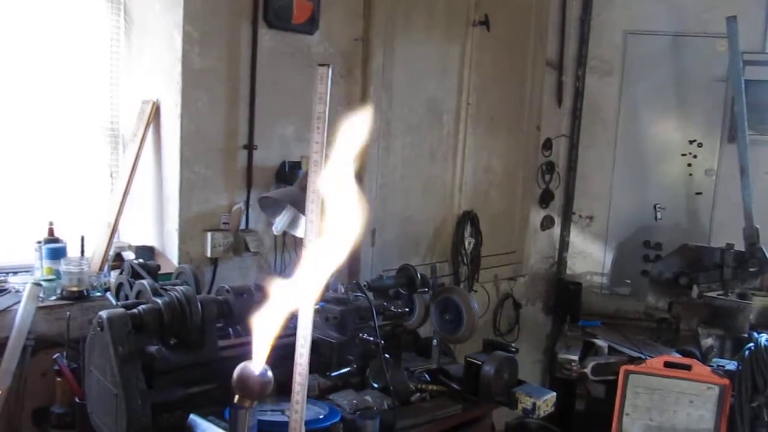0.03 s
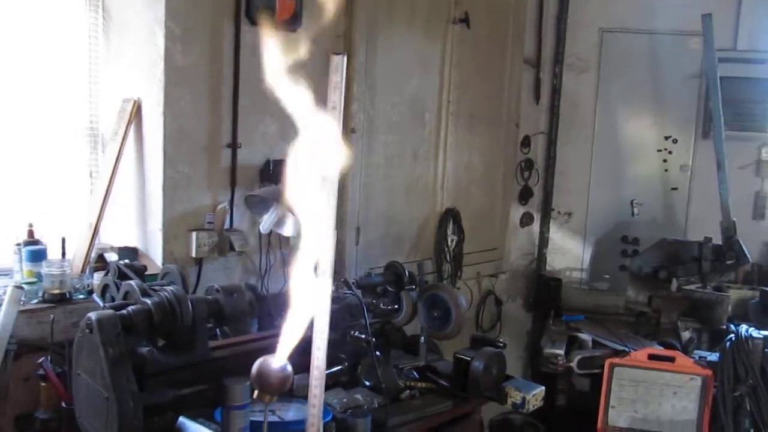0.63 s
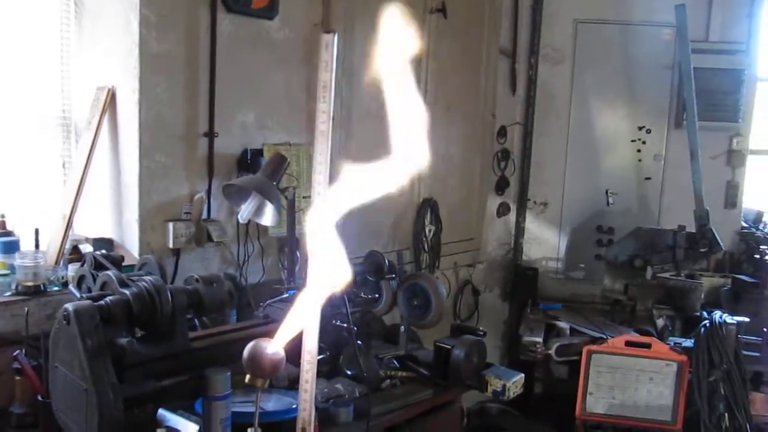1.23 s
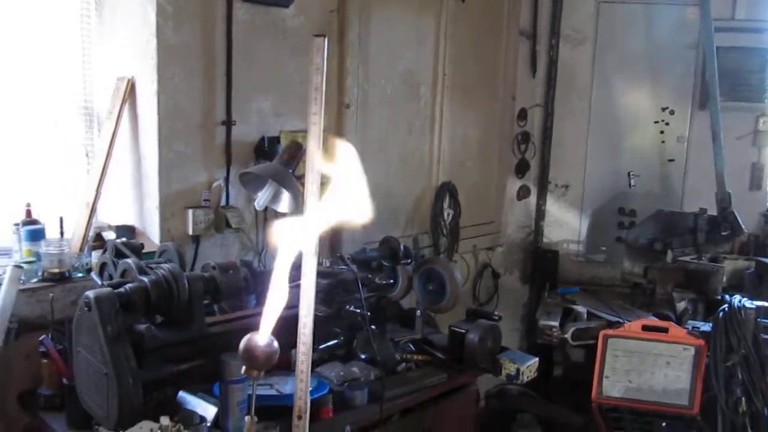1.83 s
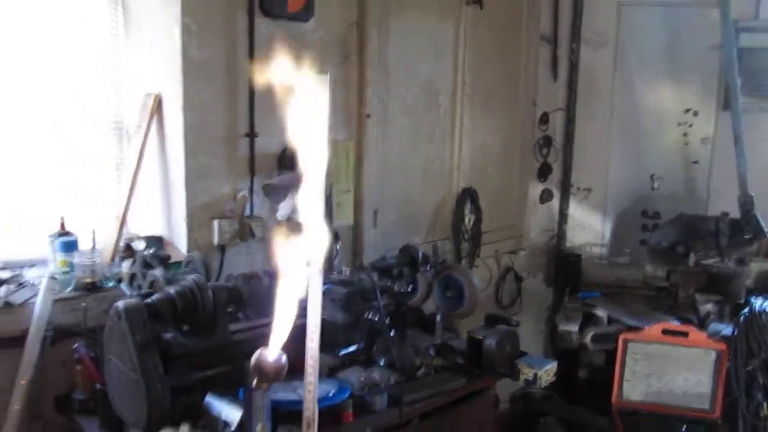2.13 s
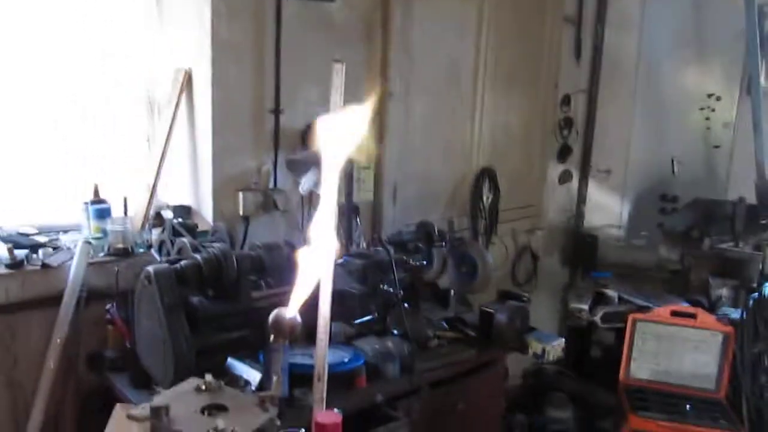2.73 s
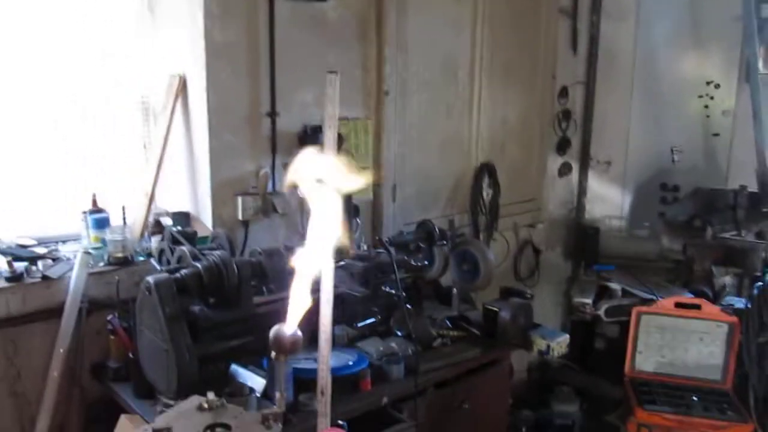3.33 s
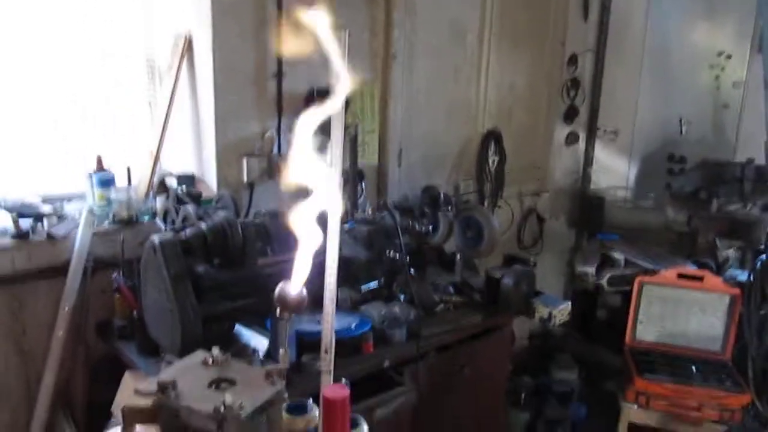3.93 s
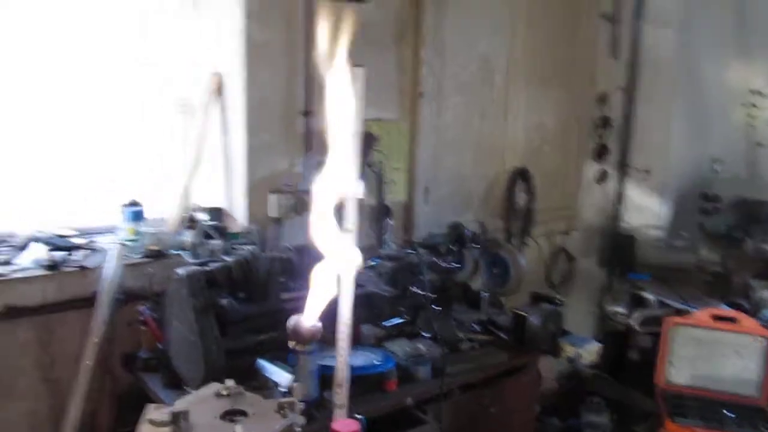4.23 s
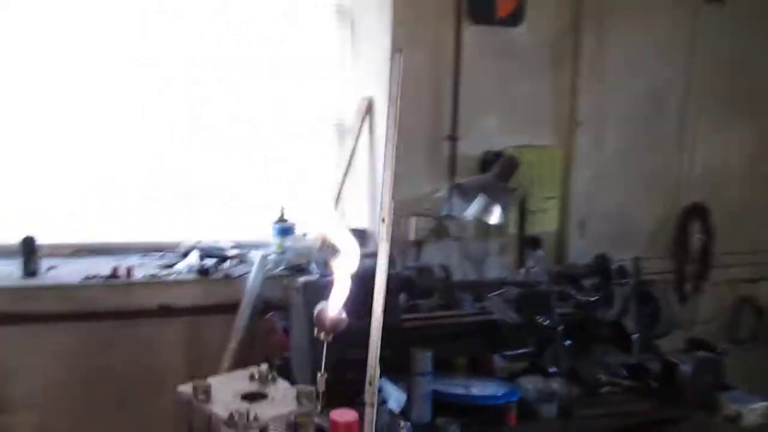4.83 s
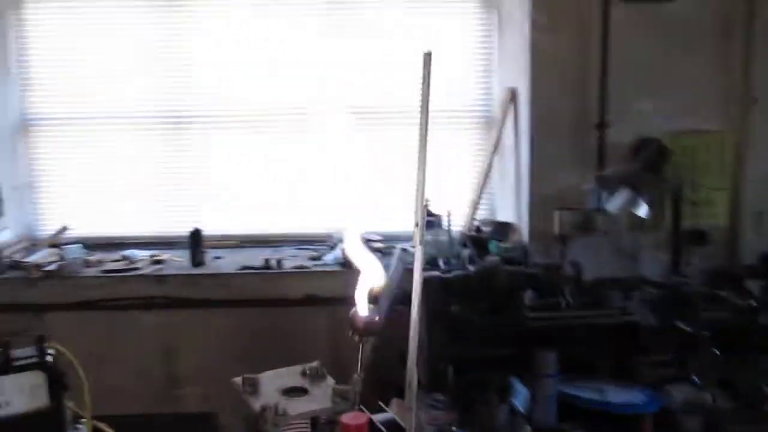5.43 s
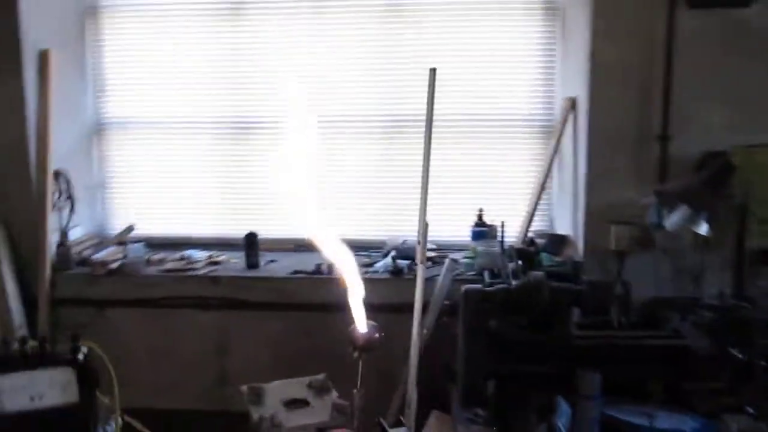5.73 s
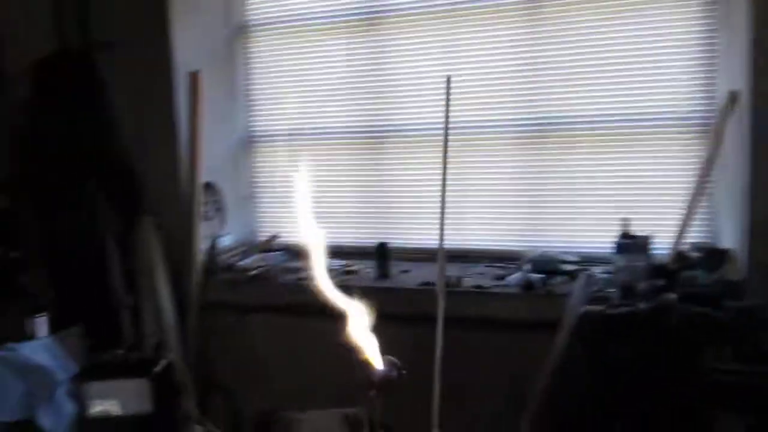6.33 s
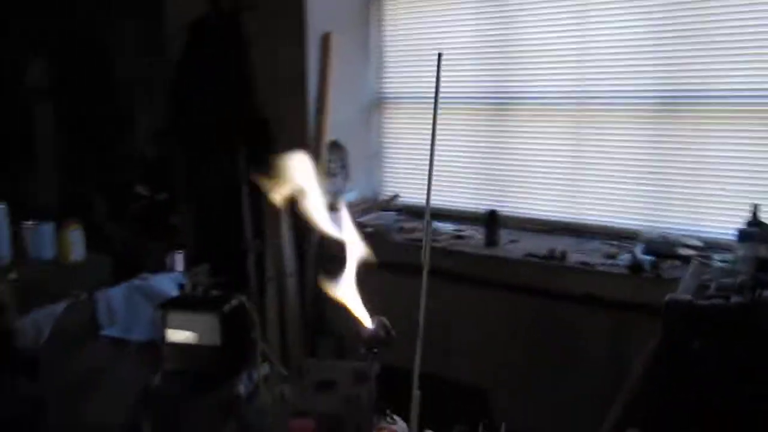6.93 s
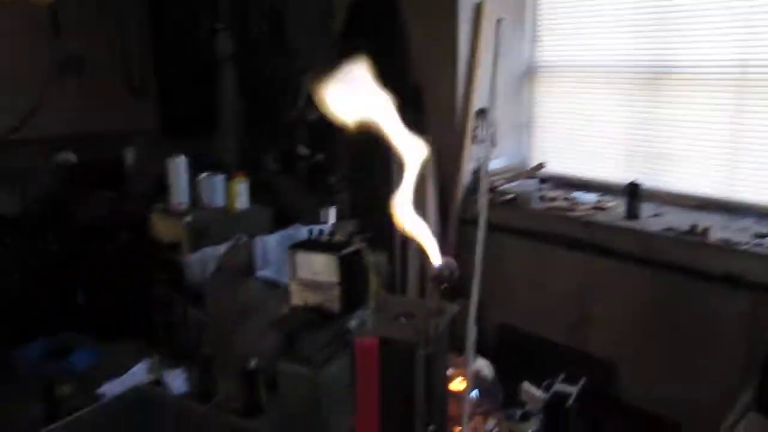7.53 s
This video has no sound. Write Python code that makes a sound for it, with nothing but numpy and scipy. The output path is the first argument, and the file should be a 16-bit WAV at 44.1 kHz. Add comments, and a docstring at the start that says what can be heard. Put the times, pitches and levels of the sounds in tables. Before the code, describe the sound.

A high-voltage flame buzzes and sizzles harshly over hum and cooling fans in a workshop, with a few sharp handling clicks.

```python
"""A harsh buzz and sizzle, flaring and sinking, fills a small workshop: a flame-like high-voltage
discharge on a ball electrode, which strikes and goes out on every half-cycle of the mains, and once
whooshes softly as it flares. Beneath it lie the harmonic hum of its supply and the blade tones and
rushing air of cooling fans. A hand-held camera is carried around it, so the balance shifts;
handling clicks and rubs the case, and the loud clicks duck its gain control."""
import sys
import numpy as np
from scipy import signal
from scipy.fft import rfft, irfft
from scipy.io import wavfile
from scipy.ndimage import uniform_filter1d, map_coordinates

SR = 44100
rng = np.random.default_rng(int(sys.argv[2]) if len(sys.argv) > 2 else 0)


def materialize(psi):
    """Save the field psi as 16-bit PCM at rate SR to the path in sys.argv[1].

    A 1-D psi becomes a single channel; in a 2-D psi each row is a channel.
    """
    bounded = np.clip(np.atleast_2d(psi).T, -1, 1)
    quanta = np.round(bounded * 32767).astype(np.int16)
    wavfile.write(sys.argv[1], SR, quanta)


N = 335160
TIME = np.arange(N) / SR
STRIKE_HZ, FIRST_STRIKE_S, BURN_S = 99.97, 0.00735, 0.00445   # two strikes per mains cycle
BAND_EDGE_HZ = SR / 2 - 100


def from_db(db):
    """Amplitude ratio of a level in decibels."""
    return 10 ** (np.asarray(db) / 20)


def rms_one(x):
    """Normalisation to unit mean square."""
    return x / np.sqrt(np.mean(x ** 2) + 1e-20)


def in_time(rows):
    """Linear interpolation of each column against the first, t/s, at every sample."""
    times, *columns = np.transpose(rows)
    return [np.interp(TIME, times, column) for column in columns]


def drift(per_s):
    """Smooth random modulation of unit rms: a cubic spline through Gaussian knots."""
    knots = rng.standard_normal(2000)
    return rms_one(map_coordinates(knots, [TIME * per_s], order=3, mode="wrap"))


def coloured(x, colour):
    """Spectral shaping by a curve of (f/Hz, gain/dB), returned at unit rms."""
    hz, db = np.transpose(colour)
    bin_hz = np.maximum(np.arange(N + 1) * SR / (2 * N), 1)
    gain = from_db(np.interp(np.log(bin_hz), np.log(hz), db))
    return rms_one(irfft(rfft(x, 2 * N) * gain)[:N])


def band(x, hz, kind, order=2):
    """Butterworth filter: a maximally flat passband."""
    return signal.sosfilt(signal.butter(order, hz, kind, fs=SR, output="sos"), x + 1e-18)


def ring(x, hz, t60):
    """Damped oscillator: a unit impulse excites a unit sine that decays by 60 dB in t60 seconds."""
    radius, angle = from_db(-60 / (t60 * SR)), 2 * np.pi * hz / SR
    return signal.lfilter([0, np.sin(angle)], [1, -2 * radius * np.cos(angle), radius ** 2], x + 1e-18)


def port(x, t60):
    """Resonance of the microphone port: a low-pass that rings after every sharp edge."""
    damped = band(ring(x, hz=9300, t60=t60), 10500, "low", order=4)
    return band(damped, BAND_EDGE_HZ, "low")


def impulses(times, sizes):
    """Band-limited interpolation: windowed sinc pulses fall between the samples."""
    at = np.floor(times * SR).astype(int)[:, None] + np.arange(-7, 9)
    offset = at - times[:, None] * SR
    taps = sizes[:, None] * np.sinc(offset) * np.cos(np.pi * offset / 16) ** 2
    inside = (at >= 0) & (at < N)
    return np.bincount(at[inside], taps[inside], N)


def reverberation(x, t60, early_db, early_s, changes):
    """Diffuse reflections, whose pattern changes as the flame writhes and the microphone moves."""
    age = np.arange(SR // 3) / SR
    decay = from_db(-60 * age / t60) + from_db(early_db) * np.exp(-age / early_s)
    hop = N // changes + 1
    padded = np.pad(x, (hop, 2 * hop))
    crossfade = np.sin(np.linspace(0, np.pi, 2 * hop))
    out = np.zeros(len(padded) + len(age))
    for at in range(0, (changes + 1) * hop, hop):
        response = rms_one(decay * rng.standard_normal(len(age)))
        echoes = signal.fftconvolve(crossfade * padded[at:at + 2 * hop], response)
        out[at:at + len(echoes)] += echoes
    return rms_one(out[hop:hop + N])


def fans(facing, pass_s=5.52, pass_width_s=0.91, recede_db_per_s=2.5, waver_rad=0.068):
    """Blade tones over turbulent air; the housing's cavity resonance swells as the microphone passes."""
    # blade tones: f/Hz, level by the bench/dB, level by the window/dB
    blade_tones = [(183.1, -53, -56.5), (366.3, -50.5, -54.5), (521, -70, -61), (547, -64, -54),
                   (725, -65, -59)]
    # spectrum of the rushing air: f/Hz, relative level/dB
    air_colour = [(20, 5.5), (42, 8), (80, 4.5), (200, 4), (450, 1), (600, 4.5), (800, 0.5), (1500, -3.5),
                  (2800, 0), (5000, -7.5), (9500, -4), (12000, -21.5), (16000, -41)]
    receding_db = recede_db_per_s * np.maximum(TIME - pass_s, 0)
    tones = 0
    for hz, bench_db, window_db in blade_tones:
        level_db = (1 - facing) * bench_db + facing * window_db - receding_db + 1.9 * drift(7.2)
        tones += from_db(level_db) * np.sin(2 * np.pi * hz * TIME + waver_rad * drift(4.3))
    passing = np.exp(-((TIME - pass_s) / pass_width_s) ** 2)
    air = from_db(-49.5 + 3 * facing + 2.5 * passing) * coloured(rng.standard_normal(N), air_colour)
    cavity = ring(rng.standard_normal(N), hz=542, t60=0.17)
    drone = from_db(-68.5 + 15 * passing) * rms_one(band(cavity, 390, "high"))
    return np.sqrt(2) * tones + air + drone


def supply_hum(place, hum_db=-54, waver_rad=0.58, shiver_rad=0.0053):
    """Standing waves: the balance of the supply's harmonics depends on the place in the room."""
    # harmonics of the strike rate, from the first upwards:
    # relative level/dB by the bench, a step back, by the window, past it
    harmonics = [(4, -0.5, 2.5, 0.5), (0, -0.5, 3, -1), (-2, -8.5, -23, -11.5), (-8.5, -2.5, -17, -3.5),
                 (-8.5, -7.5, -5, -12), (-6.5, -2.5, -3, -3.5), (-24, -19, -13, -16), (0, 0.5, -28, -6.5),
                 (-6, -10, -8, -5.5), (-6, -12, -3.5, -5.5), (-26, -3, -14, -16), (-7, -6.5, -1.5, -5),
                 (-1, -5, -11, -7), (-11, -12, -10, -14), (-5.5, -5.5, -15, -6), (-1, -6, -7, -3.5),
                 (-7.5, -4.5, -4, -11), (-5, -13, -20, -13), (-5, -4, -20, -3), (-26, -24, -22, -14),
                 (-26, -23, -12, -8), (-5, -15, -22, -8)]
    places = [0, 0.25, 1, 1.15]
    phase = 2 * np.pi * STRIKE_HZ * TIME + shiver_rad * drift(70)
    out = 0
    for k, place_db in enumerate(harmonics, 1):
        nodes_db = 0.93 * np.log(1 + k) / 2 * drift(2.27)   # shorter waves have sharper nodes
        rough_db = (1.05 + 0.057 * k) * drift(14)   # the restless flame roughens the higher ones
        level_db = np.interp(place, places, place_db) + nodes_db + rough_db
        lag = np.sqrt(7) * k ** 2   # the room spreads the harmonics over the whole cycle
        out += from_db(level_db) * np.sin(k * phase + lag + waver_rad * drift(2.916))
    return np.sqrt(2) * from_db(hum_db) * out


def whoosh_and_rubs(grain_db=3):
    """Band-limited noise bursts: a soft low whoosh as the flame flares, then skin rubbing on plastic."""
    # the flame's whoosh (first row) and rubs on the case (the other rows):
    # t/s, duration/s, greatest level/dB, centre f/Hz, bandwidth/octaves
    bursts = [(1.53, 0.12, -51, 190, 2.4), (2.798, 0.025, -43.5, 2500, 1.1),
              (2.977, 0.033, -43, 10700, 0.31), (2.99, 0.036, -34.5, 2470, 0.59),
              (2.999, 0.014, -37, 8950, 1.1), (3.028, 0.043, -46, 10300, 0.42),
              (3.05, 0.016, -60.5, 2390, 0.9), (5.065, 0.093, -39.5, 950, 1.8),
              (5.066, 0.094, -39, 3300, 1.5), (5.158, 0.089, -43, 1500, 1.8),
              (5.759, 0.081, -44.5, 2800, 1.2), (5.88, 0.015, -36.5, 1080, 0.76),
              (6.049, 0.13, -42, 4000, 1.05), (6.93, 0.077, -41.5, 1770, 0.4)]
    size = SR // 2
    out, age = np.zeros(N + size), np.arange(size) / SR
    for start, length, db, hz, octaves in bursts:
        grains = rng.standard_normal(size) * from_db(grain_db * rng.standard_normal(size))
        edge_ratio = 2 ** (octaves / 2)
        noise = rms_one(band(grains, [hz / edge_ratio, hz * edge_ratio], "band", order=3))
        progress = 4.65 * age / length   # loudest where this reaches 1
        at = int(start * SR)
        out[at:at + size] += from_db(db) * noise * progress * np.exp(1 - progress)
    return out[:N]


def case_clicks(tick_t60=0.0012, rattle_db=-15, rattle_s=0.0016, body_db=-19, body_s=0.0041):
    """Impact excitation: the case gives way with a knock, a tick and a rattle, then rings in its modes."""
    # clicks: t/s, knock level/dB, knock f/Hz, knock t60/s, tick level/dB, tick f/Hz
    clicks = [(2.4565, -18, 1390, 0.0083, -5.5, 9800), (2.4568, -5, 3530, 0.0014, -8, 7340),
              (2.4793, -19, 2900, 0.0038, -33, 9500), (2.4820, 2, 2760, 0.003, 2.5, 8500),
              (2.4822, -9.5, 1330, 0.014, -4, 10000), (2.9193, -22, 3800, 0.02, -4.5, 10300),
              (2.93, -37, 2300, .008, -31, 9500), (2.9555, -31, 2400, .006, -32, 10300),
              (2.9658, -31, 4050, .008, -17, 10000), (3.0111, -8, 2520, 0.0077, -21, 9600),
              (3.0614, -24, 3990, 0.033, -19.5, 9450), (3.063, -21.5, 2970, 0.0099, -26, 6940),
              (3.0619, -30, 12600, .025, -37, 10000), (3.4380, -31.5, 5070, 0.0076, -19, 10000),
              (3.5115, -21.5, 3850, 0.007, -17, 7900), (3.5149, -19, 2400, .004, -0.5, 10800),
              (3.5166, 4.5, 2480, 0.0053, -4.5, 9300), (3.5196, 12, 1820, 0.0012, 15.5, 9770),
              (3.5182, 1, 5370, 0.0021, -3, 7860), (3.7240, -21, 2370, 0.0019, -25, 8000),
              (5.0677, -21, 1170, 0.012, -34, 9000), (5.0678, -29, 3280, 0.0021, -40, 6000),
              (5.7458, -14, 2300, 0.006, -36, 9100), (5.7453, -22, 3650, 0.012, -38, 9000),
              (5.8156, -14.5, 2300, 0.0015, -25.5, 10700), (7.5533, -16, 2940, 0.0026, -22, 10400),
              (7.557, -19.5, 3600, 0.014, -35, 9000), (7.5564, -11, 1960, 0.0026, -21, 7950)]
    # modes of the case: f/Hz, level relative to the tick/dB, t60/s
    case_modes = [(1610, -40, 0.056), (4160, -42.5, 0.093), (4590, -18.5, 0.012), (9600, -38, 0.047)]
    # dull bumps against the case: t/s, level/dB, f/Hz, t60/s
    thumps = [(2.481, -23, 78, 0.023), (2.483, -30, 271, 0.12), (3.516, -26.5, 298, 0.13),
              (5.0667, -37, 430, 0.027)]
    size = SR // 4
    out, age = np.zeros(N + size), np.arange(size) / SR
    blow = signal.unit_impulse(size)
    ringing = sum(from_db(db) * ring(blow, hz, t60) for hz, db, t60 in case_modes)
    for start, knock_db, knock_hz, knock_t60, tick_db, tick_hz in clicks:
        tick = ring(ring(blow, tick_hz, tick_t60), tick_hz, tick_t60)   # builds up over a few cycles
        tick = band(tick, BAND_EDGE_HZ, "low")
        chatter = rms_one(port(rng.standard_normal(size), t60=0.00082))
        rattle = from_db(rattle_db) * chatter * np.exp(-age / rattle_s)
        body = rms_one(band(rng.standard_normal(size), [1200, 4800], "band"))
        knock = ring(blow, knock_hz, knock_t60) + from_db(body_db) * body * np.exp(-age / body_s)
        bright = tick / np.abs(tick).max() + rattle + ringing
        at = int(start * SR)
        out[at:at + size] += from_db(knock_db) * knock + from_db(tick_db) * bright
    # small parts radiate little bass; only a bump of the whole case does
    bumps = sum(ring(impulses(np.array([t]), from_db([db])), hz, t60) for t, db, hz, t60 in thumps)
    return band(out[:N], 1110, "high") + bumps


def strikes_and_pops(jitter_s=8e-6, flicker_db=1.0, lopsided_db=0.5, lopsided_s=40e-6):
    """Periodic breakdown and extinction: strike times, sharp strikes, and duller pops on going out."""
    half_cycle = np.arange(int(N / SR * STRIKE_HZ))
    strike_shift, strike_size, pop_shift, pop_size = rng.standard_normal((len(half_cycle), 4)).T
    times = FIRST_STRIKE_S + half_cycle / STRIKE_HZ
    times += 14e-6 * drift(7)[(times * SR).astype(int)]   # the writhing flame shifts the strike
    strikes = -impulses(times + jitter_s * strike_shift, from_db(flicker_db * strike_size))
    polarity = (-1) ** half_cycle   # one mains polarity burns harder and longer than the other
    pop_times = times + BURN_S + lopsided_s * polarity + 25e-6 * pop_shift
    pops = impulses(pop_times, from_db(1.5 + lopsided_db * polarity + flicker_db * pop_size))
    return times, strikes, band(pops, 3400, "low")


def channel_snap(times, pulses, swell_db=4):
    """Direct sound: the pulses, and about a millisecond of air expansion as the channel reignites."""
    swell = signal.oaconvolve(impulses(times, np.ones(len(times))), np.hanning(45) / 22, "same")
    pressure = band(pulses + from_db(swell_db) * swell, 570, "high", order=1)
    return rms_one(port(band(pressure, 1700, "low", order=1), t60=0.0007))


def room_buzz(pulses):
    """Reverberant field of the pulse train: reflections smear its treble into a buzz."""
    # spectral weighting of the buzz: f/Hz, gain/dB
    buzz_colour = [(1500, -1.5), (2100, 8), (2800, -1), (3600, -0.5), (4600, -2), (5800, -3), (7000, 1),
                   (10000, -26)]
    echoes = reverberation(pulses, t60=0.48, early_db=-3.5, early_s=0.028, changes=30)
    return band(coloured(echoes, buzz_colour), 2000, "high", order=4)


def air_rasp(since_strike, puff_s=0.00083, quench_db=-1):
    """Amplitude-modulated noise: a puff of rough air as the channel strikes, another as it goes out."""
    # spectrum of the puffs: f/Hz, relative level/dB
    rasp_colour = [(300, -12), (700, 3), (1300, 7), (2600, -0.5), (4500, -10), (7000, -28), (12000, -40)]
    since_quench = (since_strike - BURN_S) % (1 / STRIKE_HZ)
    puffs = np.exp(-since_strike / puff_s) + from_db(quench_db) * np.exp(-since_quench / puff_s)
    return coloured(rng.standard_normal(N) * puffs, rasp_colour)


def discharge(fizz_db=-4.5, fizz_s=0.016, whistle_hz=7960, flutter_db=1.46):
    """Gas breakdown on each half-cycle snaps, buzzes and sizzles, all following the flame's vigour."""
    # the flame flares and sinks: t/s, vigour about its usual size/dB
    flame = [(0.01, 5), (0.07, 6.5), (0.11, 1.5), (0.31, 3.5), (0.41, 6.5), (0.47, 9.5), (0.53, 1.5),
             (0.69, 8.5), (0.75, 1), (0.97, 6.5), (1.11, 4), (1.21, 5), (1.33, 4), (1.39, 6), (1.43, 3.5),
             (1.55, 6), (1.63, 9.5), (1.77, -9.5), (1.87, 1), (1.91, 3.5), (2.07, 3), (2.15, 8), (2.19, -4),
             (2.27, 6), (2.29, -5.0), (2.33, 7.5), (2.37, -5), (2.51, 1), (2.57, -8), (2.65, -1),
             (2.69, -14), (2.81, -1.5), (2.85, -4), (3.07, 8), (3.15, -1), (3.19, -7.5), (3.25, 3),
             (3.29, -6), (3.45, -6), (3.49, -2), (3.55, 2), (3.67, 5), (3.71, -11.0), (4.05, 2.5),
             (4.09, -3), (4.15, -1), (4.21, 4), (4.31, -5.5), (4.41, 1.5), (4.45, -7), (4.51, -3),
             (4.57, 3), (4.61, -12), (4.73, -3), (4.81, 6.5), (4.87, 12), (4.91, -8), (4.95, -14),
             (5.05, 3), (5.37, -5), (5.41, 0.5), (5.47, 2), (5.51, -5), (5.59, -9), (5.79, 6), (5.83, -0.5),
             (6.35, 5.5), (6.37, -4), (6.45, 8), (6.53, 9), (6.59, -3), (6.65, 5), (6.69, -9), (6.77, -3),
             (6.85, 2), (6.89, -4.5), (7.01, 0), (7.05, 6), (7.09, -6), (7.25, 4.5), (7.29, 0), (7.43, 3),
             (7.51, -2), (7.57, 2.5)]
    # spectral weighting of the sizzle: f/Hz, gain/dB
    sizzle_colour = [(2500, -45), (4500, 1.5), (6000, -8), (7400, -0.5), (8400, 14), (9000, 7),
                     (10200, 4.5), (11000, -7.5), (12500, -17.5), (16000, -28)]
    vigour_db, = in_time(flame)
    times, strikes, pops = strikes_and_pops()
    since_strike = (TIME - FIRST_STRIKE_S) % (1 / STRIKE_HZ)
    fizz = rms_one(rng.standard_normal(N) * np.exp(-since_strike / fizz_s))
    snap = from_db(-51.5 + 0.9 * vigour_db) * channel_snap(times, strikes + pops)
    buzz_db = -49 + 0.067 * vigour_db
    buzz = from_db(buzz_db) * room_buzz(strikes + pops)
    # in a flare the sizzle turns from soft fizz towards sharp crackle
    crackle = reverberation(strikes, t60=0.14, early_db=13, early_s=0.0011, changes=56)
    burning = from_db(0.1 * vigour_db) * crackle + from_db(fizz_db) * fizz
    sizzle = from_db(-49 + 0.39 * vigour_db) * coloured(burning, sizzle_colour)
    # a narrow resonance keeps a thin, nearly steady whistle in the buzz
    resonance = band(ring(burning, whistle_hz, t60=0.023), [7000, 9000], "band")
    whistle = from_db(buzz_db - 3.5) * rms_one(resonance)
    flutter = from_db(flutter_db * drift(22))   # the flame flaps in its own updraught
    rasp = from_db(-50.5 + 0.13 * vigour_db) * air_rasp(since_strike)
    return flutter * (snap + sizzle + rasp) + whistle + buzz


def scene():
    """Superposition of discharge, machinery and handling at one moving microphone."""
    # the walk: t/s, place (0 by the bench, 1 facing the window, more is past it),
    # hum gain/dB, discharge gain/dB
    walk = [(0, 0.048, -1, -.5), (0.8, 0.012, -0.11, 0.21), (1.6, 0.022, -0.29, 0.18), (1.9, 0.15, 0, 0),
            (2.5, 0.17, 0, -.5), (3.5, 0.31, -1.9, -1.2), (4.25, 0.16, -0.15, 0.34),
            (4.85, 0.38, 0.026, -1.3), (5.25, 0.84, 0, -0.88), (5.8, 1, 0.51, .5),
            (6.25, 1.44, 0.79, -0.92), (7.6, 1.14, -1.4, -0.61)]
    place, hum_db, discharge_db = in_time(walk)
    facing = np.clip(1 - np.abs(1 - place), 0, 1)   # how squarely the window is faced
    electrical = from_db(discharge_db) * discharge() + from_db(hum_db) * supply_hum(place)
    return (electrical + fans(facing) + case_clicks() + whoosh_and_rubs())[None]


def released(over_db, db_per_s):
    """Peak detection: the level follows every rise at once and falls back at a steady rate."""
    fall = db_per_s * TIME
    return np.maximum.accumulate(over_db + fall) - fall


def record(dry, threshold_db=-4, slope=0.85, slow_share=0.38, ceiling=0.9, cutoff_hz=16000):
    """Automatic gain control with a fast, then slow recovery; soft saturation and a steep low-pass."""
    level_db = 20 * np.log10(np.abs(dry[0]) + 1e-9)
    over_db = slope * np.maximum(level_db - threshold_db, 0)
    duck_db = np.maximum(released(over_db, db_per_s=15), released(slow_share * over_db, db_per_s=2))
    ducked = dry * from_db(-uniform_filter1d(duck_db, size=16))
    rounded = ceiling * np.tanh(ducked / ceiling)
    return signal.sosfilt(signal.ellip(10, 0.1, 90, cutoff_hz, fs=SR, output="sos"), rounded)


dry = scene()
out = record(dry)
materialize(out)
```